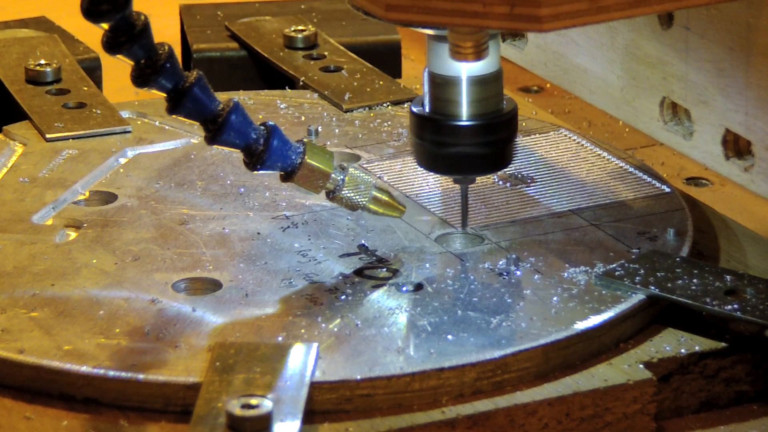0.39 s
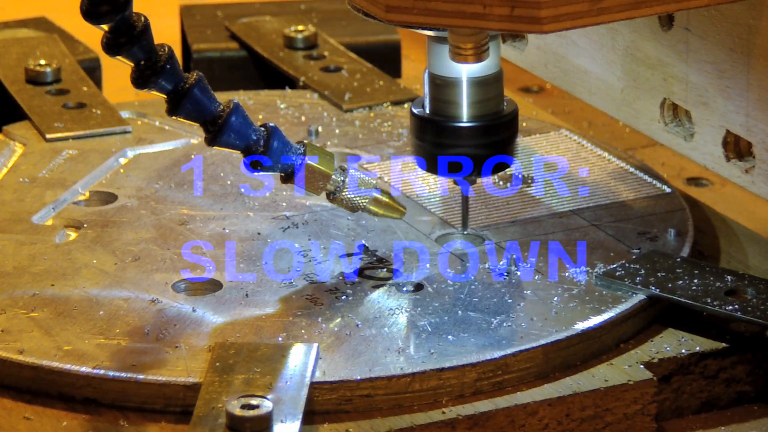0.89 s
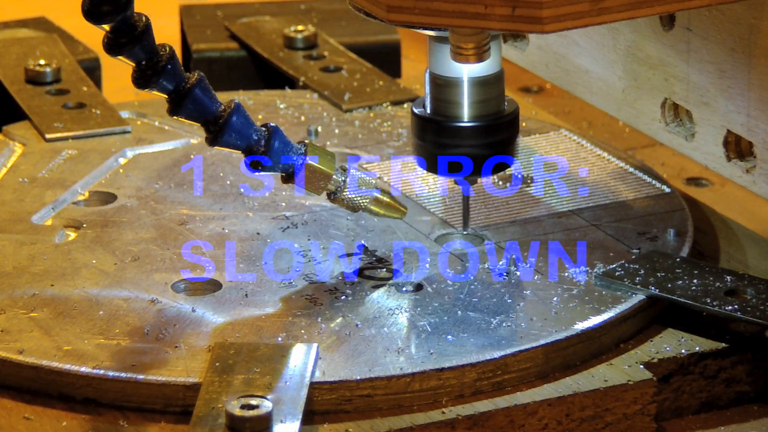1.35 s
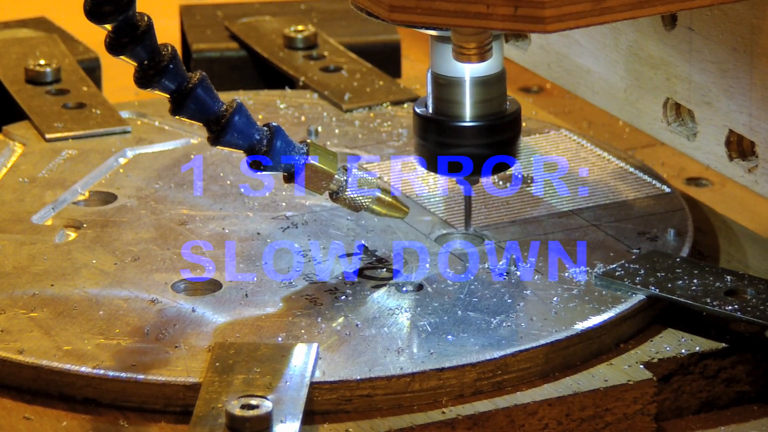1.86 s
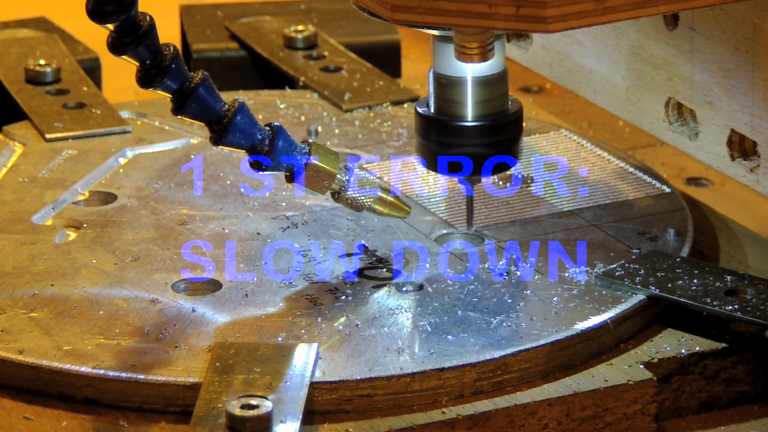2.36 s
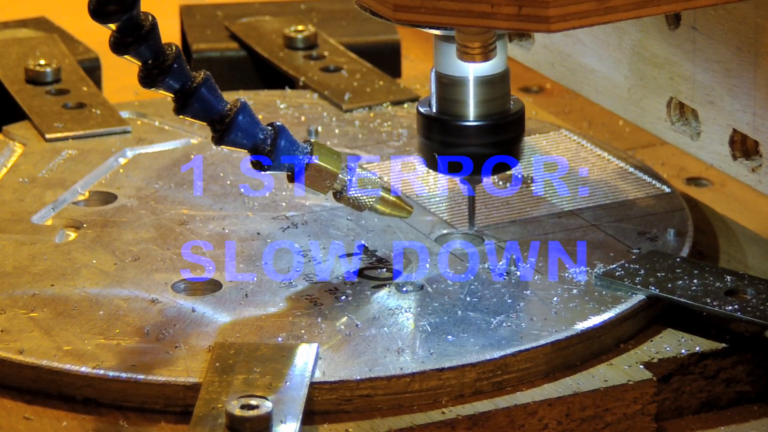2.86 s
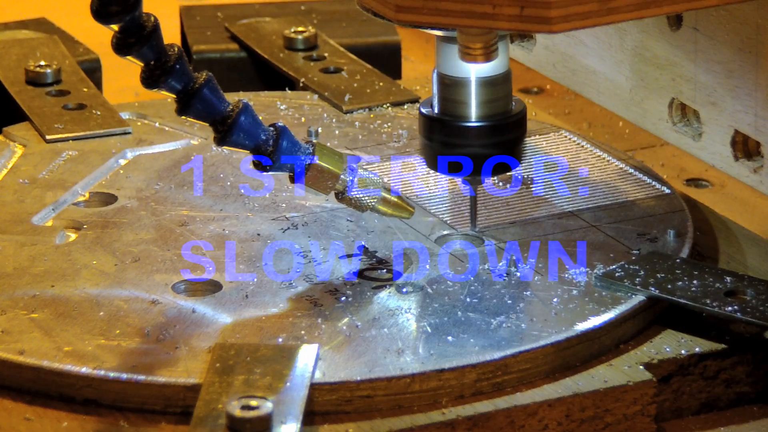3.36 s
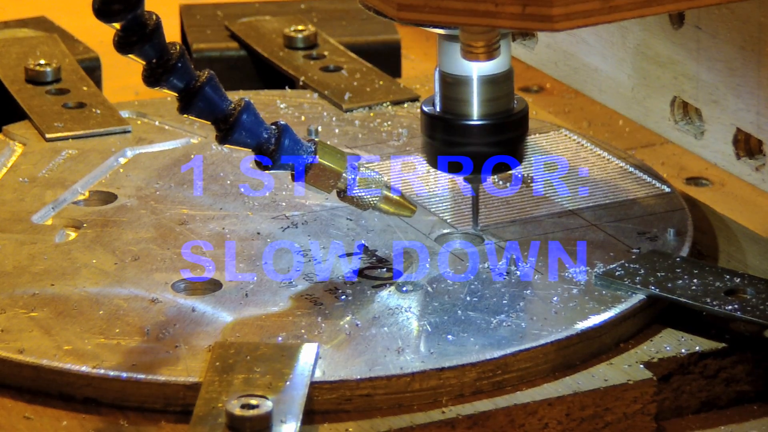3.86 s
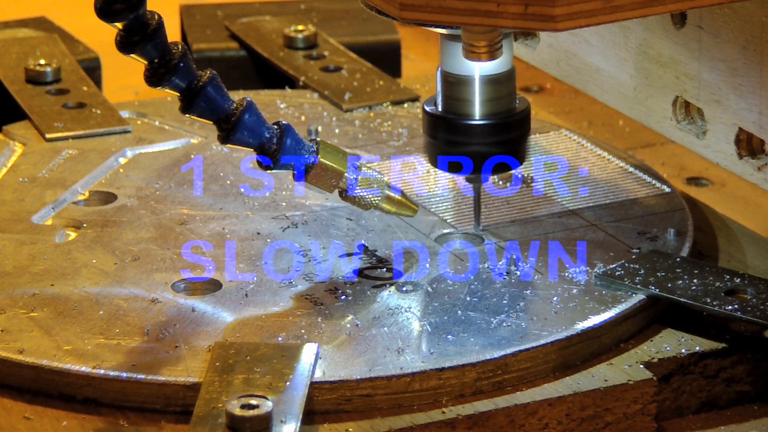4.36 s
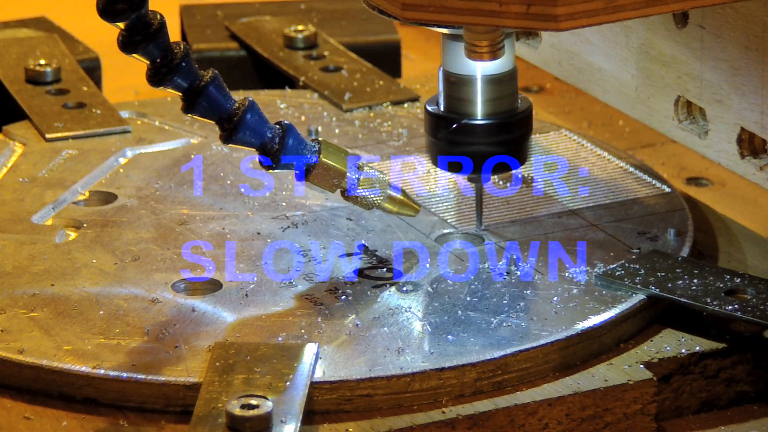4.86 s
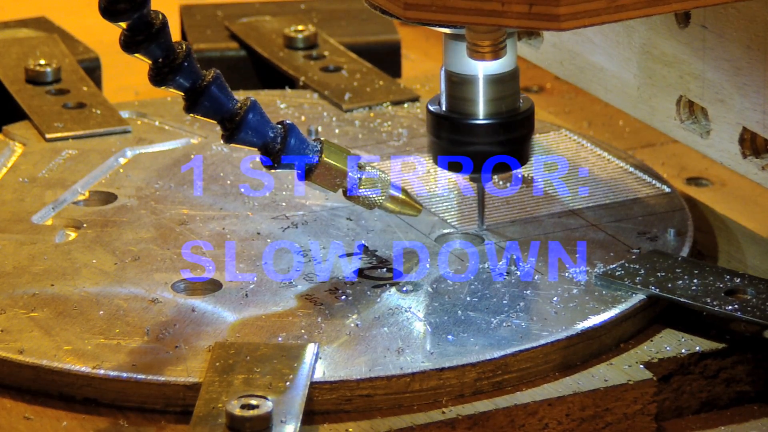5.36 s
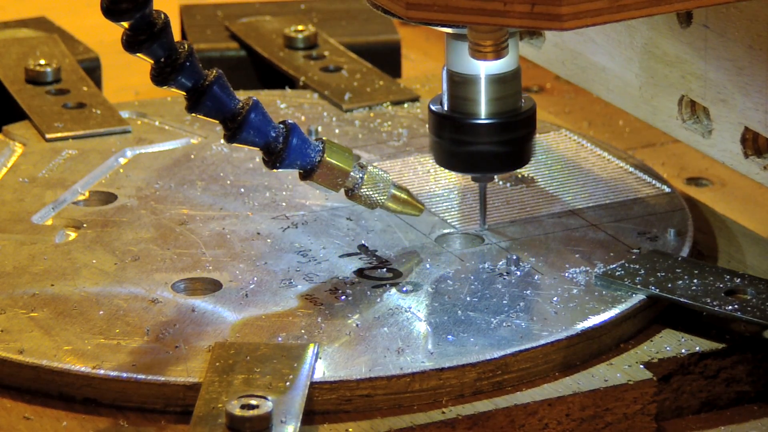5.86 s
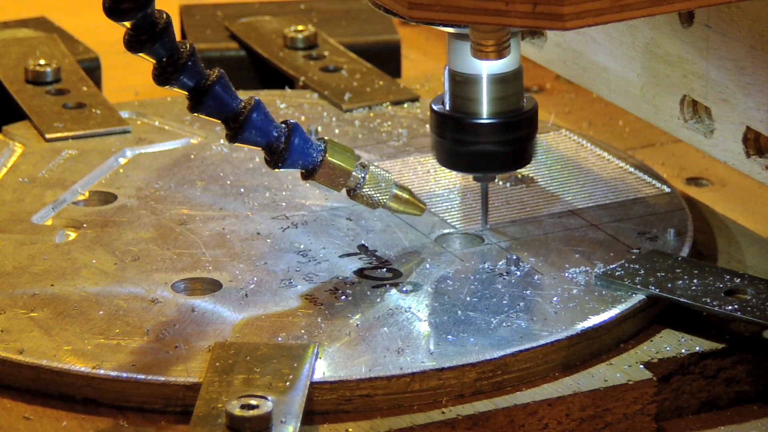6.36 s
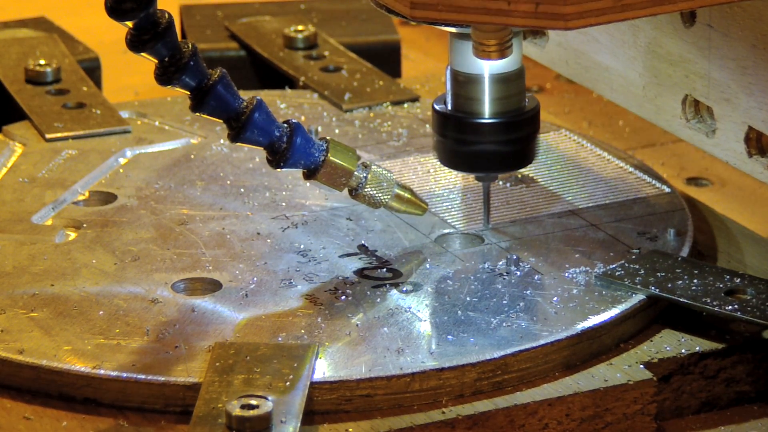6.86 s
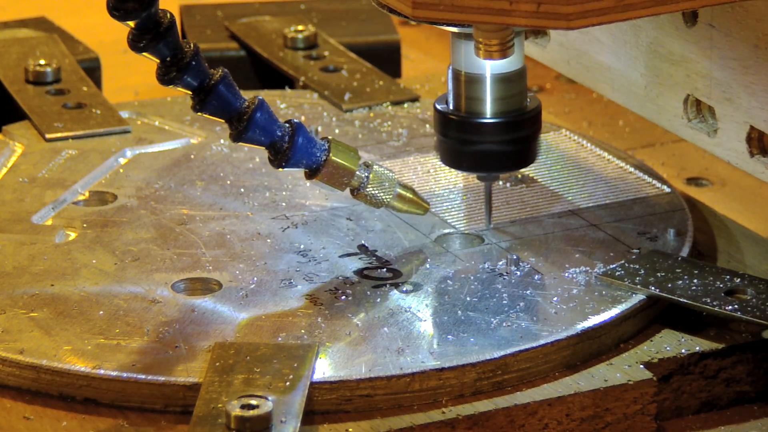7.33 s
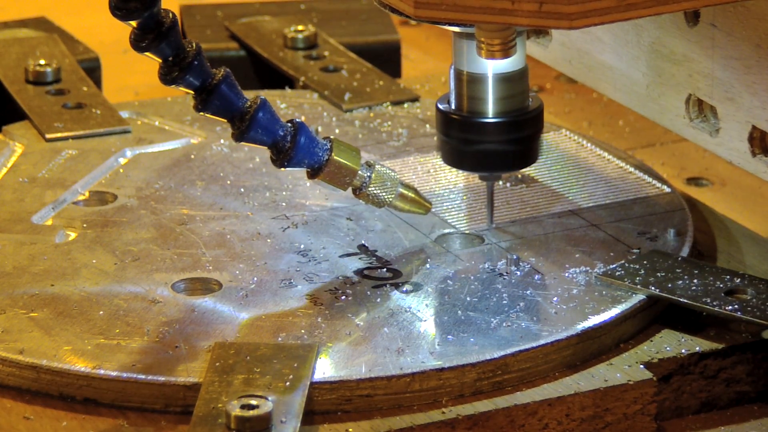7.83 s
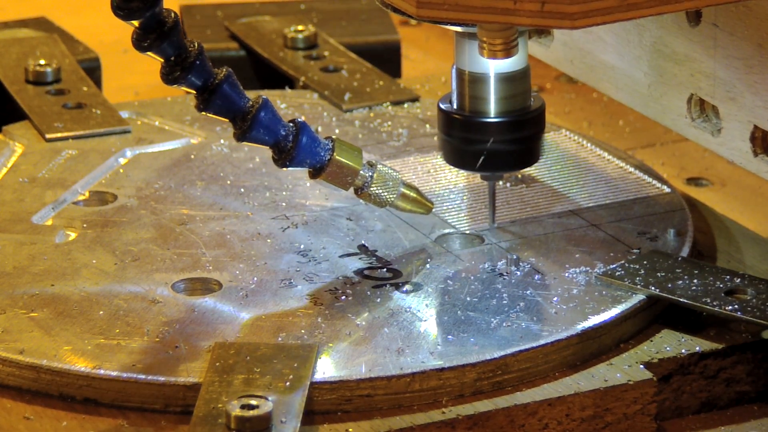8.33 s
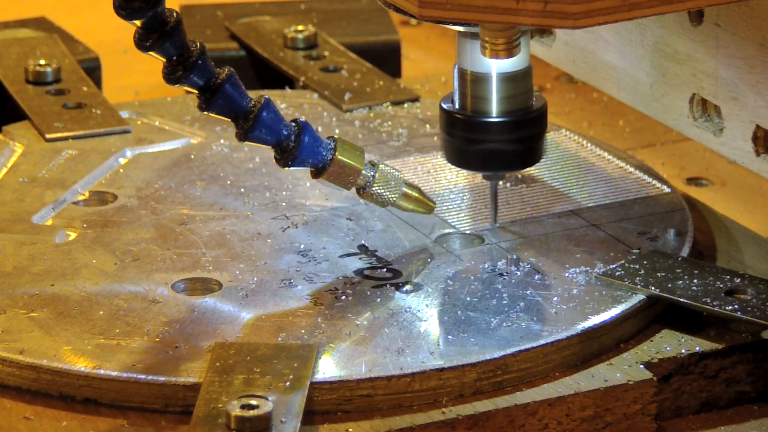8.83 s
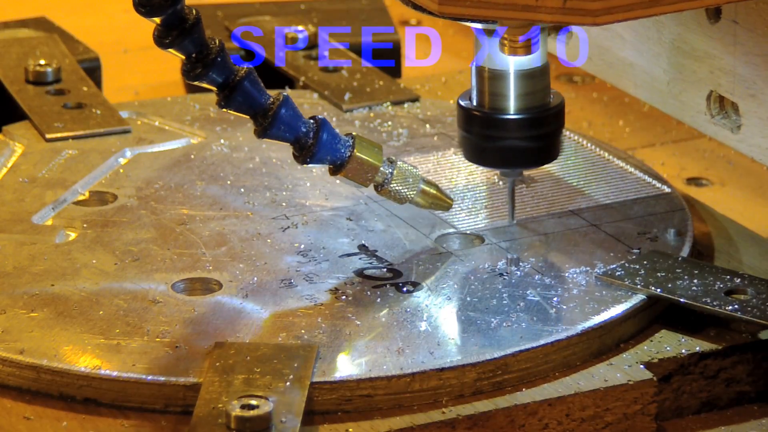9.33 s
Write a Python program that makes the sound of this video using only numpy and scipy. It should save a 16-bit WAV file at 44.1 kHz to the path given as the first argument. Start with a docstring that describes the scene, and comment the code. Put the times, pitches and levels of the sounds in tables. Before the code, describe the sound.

An air pump drones and knocks with fan hiss in a workshop; a small mill starts feeding, then bites into aluminium with a throbbing, chattering whine.

```python
"""An air pump drones and knocks over the hum of an axis drive; fans and the air jet fill the workshop.
The parked axis's holding tone dies away, positioning moves shake the frame and the feed tones rise.
After two seconds a small two-flute mill bites into an aluminium plate, with throbbing bites and chatter.
Motors are sums of orders of a turning angle; bites and noise ring resonances; air is shaped noise."""
import sys
import numpy as np
from scipy import signal
from scipy.fft import rfft, irfft, next_fast_len
from scipy.io import wavfile

SR = 44100
rng = np.random.default_rng(int(sys.argv[2]) if len(sys.argv) > 2 else 0)


def to_wav(s):
    """Save 16-bit WAV."""
    ch = np.atleast_2d(s).T  # columns
    pcm = np.round(np.clip(ch, -1, 1) * 32767)  # PCM
    wavfile.write(sys.argv[1], SR, pcm.astype(np.int16))


def how_loud(loudness_db):
    """Turn decibels into a plain amplitude multiplier (0 dB gives 1, 20 dB gives 10)."""
    steps = np.asarray(loudness_db, float) / 20
    return 10 ** steps


N = 417186
TIME, SIZE = np.arange(N) / SR, next_fast_len(N + SR // 2)
BINS = np.arange(SIZE // 2 + 1) * SR / SIZE + 1e-3   # Hz, kept off zero for divisions and logs
PUMP_HZ, DRIVE_HZ, SPINDLE_HZ = 45.62, 49.65, 133.8   # at pitch factor 1
TOUCH_S, PLUNGE_S = 2.15, 0.46   # first contact, time to full depth


def in_time(rows):
    """Join (time [s], value) rows by straight lines."""
    time_s, value = np.transpose(rows)
    return np.interp(TIME, time_s, value)


def at_hz(points, hz):
    """Read a spectrum on a log frequency axis."""
    point_hz, db = np.transpose(points)
    return np.interp(np.log(hz), np.log(point_hz), db)


def ramp(start_s, length_s):
    """Straight rise from 0 to 1."""
    return np.clip((TIME - start_s) / max(length_s, 1e-3), 0, 1)


def bump(centre_s, rise_s, fall_s, db):
    """Gaussian swell (or dip) in dB with separate rise and fall."""
    width_s = np.where(TIME < centre_s, rise_s, fall_s)
    return db * np.exp(-((TIME - centre_s) / width_s) ** 2)


def drift(rate_hz):
    """Slow random wander of spread 1: noise through a double pole, run at SR / 40."""
    pole = np.exp(-80 * np.pi * rate_hz / SR)
    noise = rng.standard_normal(N // 40 + 4002)
    slow = signal.lfilter([1], [1, -2 * pole, pole * pole], noise)[4000:]   # settled part
    return np.interp(np.arange(N) / 40, np.arange(len(slow)), slow / slow.std())


def resonances(modes, hz):
    """Complex response of parallel resonances with alternating signs."""
    total = 0
    for k, (mode_hz, width_hz, db) in enumerate(modes):
        total = total + (-1) ** k * how_loud(db) / (1 + 1j * (hz - mode_hz * mode_hz / hz) / width_hz)
    return total


def through(x, response):
    """Filter by a response given on BINS."""
    return irfft(rfft(x, SIZE) * response, SIZE)[..., :N]


def smear(decay_s):
    """Response of scattered decaying echoes: phase only, so timing blurs and colour stays."""
    echoes = rng.standard_normal(4000) * np.exp(-np.arange(4000) / (decay_s * SR))
    return np.exp(1j * np.angle(rfft(echoes, SIZE)))


# Pitch factor; every tone played by turns() rises 0.13 percent at 7.9 s: (time [s], factor [1])
PITCH_FACTOR = [(0, 1), (7.9, 1), (8.0, 1.0013), (9.5, 1.0013)]


def turns(hz):
    """Running count of cycles: the integral of rate times pitch factor."""
    return np.cumsum(hz * in_time(PITCH_FACTOR)) / SR


def cycle(lines, turn):
    """Play one revolution, given as complex rms lines per order, at the running angle."""
    table = irfft(lines, 8192) * 8192 / np.sqrt(2)
    return np.interp(turn % 1, np.arange(8193) / 8192, np.append(table, table[0]))


def orders(rows, turn, loose):
    """Steady orders plus two slowly wandering sets, so each order breathes by itself."""
    order, db = np.transpose(rows)
    out = 0
    for weight in (1, loose * drift(1.07), loose * drift(5.0)):
        lines = np.zeros(4097, complex)
        lines[order.astype(int)] = how_loud(db) * np.exp(2j * np.pi * rng.random(len(order)))
        out = out + weight * cycle(lines, turn)
    return out


# Brief swells of pump, hum and air together as the cut begins: (time [s], swell [dB])
ENTRY_SWELLS = [(2.19, 2), (2.5, 1), (2.68, 2.5)]


def entry_swell_db():
    """Brief swells as the cut begins, quick to rise and slower to fall."""
    rise_s, fall_s = 0.019, .12
    return sum(bump(s, rise_s, fall_s, db) for s, db in ENTRY_SWELLS)


# Common waxing and waning of pump, hum and air: (time [s], level [dB])
COMMON_LEVEL = [(0, .5), (.8, -1.5), (1.4, -0.04), (2, -1), (3.2, -0.4), (4.5, 0), (5.3, -0.2), (6, 1),
                (6.7, 0), (7.4, .5), (8.3, -0.8), (8.9, 0.5)]


def surge_db():
    """Slow wandering of the common level plus the entry swells."""
    return in_time(COMMON_LEVEL) + entry_swell_db()


# Pump tones before wander and surge: (order of the pump turn, level [dB rms])
PUMP_ORDERS = [(1, -29), (2, -33.5), (3, -52), (4, -43.5), (5, -35.5), (6, -49.5), (7, -41), (8, -44),
               (9, -33.5), (10, -27), (11, -31), (12, -29), (13, -26.5), (14, -45), (15, -33.5),
               (16, -34.5), (17, -30), (18, -35), (19, -36), (20, -33.5), (21, -46.5), (22, -38.5),
               (23, -44.5), (24, -35), (25, -33.5), (26, -36.5), (27, -52.5), (28, -44), (29, -51.5),
               (30, -40), (31, -49), (32, -34), (33, -39), (34, -49), (35, -39.5), (36, -47.5), (37, -45),
               (38, -47.5), (39, -44.5), (40, -39.5), (41, -41), (42, -47), (43, -41), (44, -49.5),
               (45, -42), (46, -44), (47, -55), (48, -48.5), (49, -58), (50, -52), (51, -64), (52, -63),
               (53, -56), (54, -51.5), (55, -52), (56, -65.5), (57, -51), (58, -48.5), (59, -55), (60, -44),
               (61, -49.5), (62, -65), (63, -64), (64, -49)]
# Valve and bearing knocks: (place in the turn [0-1], relative level [dB])
PUMP_KNOCKS = [(0, -4.5), (.37, -2), (0.618, -9)]
# Shell resonances rung by the knocks: (frequency [Hz], width [Hz], gain [dB])
SHELL_MODES = [(3680, 990, -56), (4450, 470, -56.5), (5800, 600, -70.5), (9500, 400, -50.5),
               (9850, 390, -51)]


def pump():
    """Drone of orders; a wobble of the turn flanks each order and knocks ring the shell up high."""
    wobble_hz, wobble_turns, wobble_depth = 8.7, .0015, 0.034
    wobble = 2 * np.pi * turns(wobble_hz)
    turn = turns(PUMP_HZ) + wobble_turns * np.sin(wobble) + .0001 * drift(3.0)
    order = np.arange(1, 4098)
    order_hz = order * PUMP_HZ
    knocks = sum(how_loud(db) * np.exp(-2j * np.pi * order * place) for place, db in PUMP_KNOCKS)
    # many small shell modes make the lines uneven
    uneven = how_loud(rng.uniform(-6, 4, len(order))) * np.exp(1j * rng.normal(0, 1, len(order)))
    audible = (order > len(PUMP_ORDERS)) * (order_hz < 16000)
    ring = knocks * uneven * resonances(SHELL_MODES, order_hz) * audible
    drone = orders(PUMP_ORDERS, turn, loose=0.14)
    knocking = cycle(np.append(0, ring[:-1]), turn)
    return (drone + knocking) * how_loud(surge_db()) * (1 + wobble_depth * np.cos(wobble))


def drive_hum(turn):
    """Drive orders 8 and 16 as sines that follow the surge; the octave fades once."""
    hum_db, octave_db = -18, -30   # rms, before surge and drift
    dip_centre_s, dip_half_width_s, dip_db = 8.15, 0.23, -16
    dip = bump(dip_centre_s, dip_half_width_s, dip_half_width_s, dip_db)
    hum = how_loud(hum_db + surge_db() + 0.66 * drift(1.5)) * np.sin(16 * np.pi * turn)
    octave = how_loud(octave_db + dip + surge_db() + 1.0 * drift(2.6)) * np.sin(32 * np.pi * turn)
    return np.sqrt(2) * (hum + octave)


def holding_tone():
    """Sine of the parked axis that dies away."""
    tone_hz, level_db_rms, end_s, fade_s = 216, -33, .5, .25
    fade = 1 - ramp(end_s, fade_s)
    return np.sqrt(2) * how_loud(level_db_rms) * fade * np.sin(2 * np.pi * tone_hz * TIME)


# Thin steady tones before level drift: (frequency at pitch factor 1 [Hz], level [dB rms])
WHINE_TONES = [(265, -45), (1044, -45), (2409, -44), (3864, -47), (4133, -52), (4669, -49), (5328, -50),
               (5738, -50), (6543, -50), (8265, -50)]


def whines():
    """Thin sines of electronics and bearings, wavering slightly in level and phase."""
    total = 0
    for hz, db in WHINE_TONES:
        phase = 2 * np.pi * turns(hz) + 0.66 * drift(0.92)
        total = total + np.sqrt(2) * how_loud(db + 1.5 * drift(1.8)) * np.sin(phase)
    return total


# Fans and air jet before bends, ripple and surge: (frequency [Hz], density [dB per Hz])
AIR_SPECTRUM = [(30, -80), (75, -58), (120, -71), (300, -59.5), (650, -62.5), (1100, -61.5), (1300, -67.5),
                (2050, -65.5), (2250, -70.5), (4000, -71.5), (6500, -67.5), (8500, -68.5), (9750, -72),
                (10600, -80.5), (12600, -99.5), (14300, -104)]
# Humps and one dip on that spectrum: (frequency [Hz], width [Hz], rise or fall [dB])
AIR_BENDS = [(457, 116, 9.5), (1442, 62, 8.5), (1790, 49, 2.5), (4140, 60, 5.5), (4750, 66, -3.5)]


def air():
    """Two independent broad noises with humps and a dip, pulsing gently three times a pump turn."""
    bends = sum(db / (1 + (2 * (BINS - hz) / width_hz) ** 2) for hz, width_hz, db in AIR_BENDS)
    # walls favour some pitches
    ripple = np.interp(BINS, np.arange(600) * 40, rng.normal(0, 2.5, 600))
    pulse = 1 + 0.055 * np.cos(6 * np.pi * turns(PUMP_HZ))
    level = pulse * how_loud(surge_db() + 0.58 * drift(3.4) + 0.24 * drift(17.0))
    white = rng.standard_normal((2, N)) * np.sqrt(SR / 2)   # unit density per Hz
    return through(level * white, how_loud(at_hz(AIR_SPECTRUM, BINS) + bends + ripple))


# Spindle tones at full running level, before wander: (order, level [dB rms])
SPINDLE_ORDERS = [(1, -40.5), (2, -38), (3, -39.5)]


def spindle():
    """Spindle orders, rising from a fifth to full amplitude."""
    running = np.clip((TIME - .5) / 0.49, .2, 1)
    return running * orders(SPINDLE_ORDERS, turns(SPINDLE_HZ), loose=0.23)


# Shaft resonances: (frequency [Hz], width [Hz], relative gain [dB])
SHAFT_MODES = [(1816, 50, -1.5), (1873, 33, 2.5), (2010, 28, -4.5)]
# Brief singing of the shaft: (time [s], swell [dB])
SHAFT_SINGS = [(7.27, 4.5), (7.68, 5), (8.01, 5)]


def shaft():
    """Flickering noise rings the shaft, louder under cutting load and in brief swells."""
    free_db, loaded_db, sing_s = -42, -39, 0.088
    level_db = free_db + (loaded_db - free_db) * ramp(TOUCH_S, PLUNGE_S)
    level_db = level_db + sum(bump(s, sing_s, sing_s, db) for s, db in SHAFT_SINGS)
    noise = how_loud(3.4 * drift(6.7)) * rng.standard_normal(N)
    band = 1 / (1 + ((BINS - 1900) / 250) ** 4)
    ring = through(noise, resonances(SHAFT_MODES, BINS) * band)
    return how_loud(level_db) * ring / ring.std()


# Frame resonances: (frequency [Hz], width [Hz], relative gain [dB])
FRAME_MODES = [(68, 17, -0.5), (133, 13, -8), (188, 20, 0.5), (236, 57, -0.5), (312, 78, -5)]
# Positioning moves, added to the resting rumble: (time [s], length [s], level [dB rms])
AXIS_MOVES = [(.51, .36, -25), (0.957, .18, -33.5), (1.24, .16, -34)]


def frame_shake():
    """Low noise rings the frame: a faint rest level plus a shudder at each move."""
    rest_db, edge_s = -49, 0.035
    level = how_loud(rest_db)
    for start_s, length_s, db in AXIS_MOVES:
        level = level + how_loud(db) * ramp(start_s, edge_s) * (1 - ramp(start_s + length_s, edge_s))
    low_pass = 1 / (1 + (BINS / 380) ** 8)
    shake = through(rng.standard_normal(N), resonances(FRAME_MODES, BINS) * low_pass)
    return level * shake / shake.std()


# Drive tones at full feed, before wander: (order, level [dB rms])
FEED_ORDERS = [(3, -45), (4, -32.5), (10, -37.5), (12, -40), (13, -50), (14, -48), (17, -47.5), (19, -46.5),
               (20, -52.5), (24, -43), (40, -48.5)]
# Tones that grow with table travel, at full feed: (order, level at time zero [dB rms])
GROWING_ORDERS = [(5, -40), (6, -46.5), (7, -43), (9.5, -47)]


def feed(turn):
    """Drive orders that come up as the axis starts; some grow as the table travels."""
    start_s, ramp_s, parked_db, growth_db_per_s = 0.56, 0.46, -22.5, 1.0
    feed_db = parked_db * (1 - ramp(start_s, ramp_s))
    travel = 0
    for order, db in GROWING_ORDERS:
        level = np.sqrt(2) * how_loud(db + growth_db_per_s * TIME)
        travel = travel + level * np.sin(2 * np.pi * order * turn)
    return how_loud(feed_db) * (orders(FEED_ORDERS, turn, loose=.15) + travel)


# Plate and cutter resonances: (frequency [Hz], width [Hz], relative gain [dB])
PLATE_MODES = [(2700, 200, -1), (2990, 200, -1), (3347, 160, 1), (4100, 170, -13.5), (6050, 550, -4.5),
               (11000, 500, -25), (12200, 700, -16.5)]


def plate_bites(turn, throb):
    """Runout makes one flute bite once a turn; click and tearing noise ring the plate."""
    bites = np.zeros(N)
    at = np.flatnonzero(np.diff(np.floor(turn)) > 0)
    bites[at] = 0.3 * how_loud(1.2 * rng.standard_normal(len(at)))
    engaged = np.exp(-5.0 * (turn % 1))
    tearing = 0.081 * engaged * rng.standard_normal(N)   # the chip shears after each bite
    low_pass = 1 / (1 + (BINS / 12700) ** 40)
    # the smear stands for waves running round the plate
    plate = through(throb * (bites + tearing), smear(0.0022) * resonances(PLATE_MODES, BINS) * low_pass)
    return plate / plate.std()


def chatter(turn, throb):
    """The tool vibrates at its own pitch, dying away after each bite, through two plate modes."""
    chatter_hz, decay_per_turn = 3186, 12   # pitch at factor 1
    level = throb * how_loud(1.5 * drift(3.0)) * np.exp(-decay_per_turn * (turn % 1))
    tone = level * np.sin(2 * np.pi * turns(chatter_hz) + 1.1 * drift(9.0))
    ring = through(tone, smear(.006) * resonances(PLATE_MODES[1:3], BINS))
    return ring / ring.std()


def cutter():
    """Bites and chatter plunge in and grow; the stepped feed makes them throb."""
    bite_db, bite_db_per_s, chatter_re_bites_db = -38.5, 0.41, -.5
    swell_factor = 1.4   # dB swing of the bite re the entry swells
    level_db = bite_db + bite_db_per_s * (TIME - TOUCH_S) + swell_factor * entry_swell_db()
    turn = turns(SPINDLE_HZ) + .007 * drift(12.0) + .05 * drift(1.0)
    step = 2 * np.pi * turns(DRIVE_HZ / 4) - .87 + .4 * drift(.8)
    throb = how_loud(3.0 * np.cos(step) + 0.7 * drift(10))
    cutting = plate_bites(turn, throb) + how_loud(chatter_re_bites_db) * chatter(turn, throb)
    return ramp(TOUCH_S, PLUNGE_S) * how_loud(level_db) * cutting


# Side spectrum before the trims in scene(): (frequency [Hz], side re mid [dB])
SIDE_SPECTRUM = [(60, -23), (110, -26), (200, -44), (370, -41), (670, -26), (1220, -23), (2230, -17),
                 (4070, -14.5), (7440, -10.5), (13600, -2)]
# Channel balance: (frequency [Hz], left re right [dB])
CHANNEL_BALANCE = [(60, 0.0), (110, 0.0), (200, 0.0), (370, 0.5), (670, 1.0), (1220, 0.5), (2230, 0.5),
                   (4070, -0.5), (7440, -1.5), (13600, -1.0)]


def scene():
    """Machines reach the two ports alike; short wall echoes and diffuse air make them differ."""
    drive_turn = turns(DRIVE_HZ) + .012 * drift(.4)
    near, diffuse = air()
    machines = pump() + drive_hum(drive_turn) + holding_tone() + whines() + spindle() + shaft()
    mid = machines + near + frame_shake() + feed(drive_turn) + cutter()
    side_db = at_hz(SIDE_SPECTRUM, BINS)
    echoes = through(mid, smear(.02) * how_loud(side_db - 2.0))
    side = echoes + through(diffuse, how_loud(side_db - 7))
    lean = how_loud(at_hz(CHANNEL_BALANCE, BINS) / 2)
    return np.array([through(mid + side, lean), through(mid - side, 1 / lean)])


def top_cut(x):
    """Nothing passes above the cut-off."""
    return signal.sosfilt(signal.butter(12, 14190, fs=SR, output="sos"), x)


def record(dry):
    """A reflection 64 microseconds late inside the housing notches 7.8 kHz; the end is cut to silence."""
    notch_hz, reflection, stop_s = 7800, .95, 8.909
    housing = (1 + reflection * np.exp(-1j * np.pi * BINS / notch_hz)) / (1 + reflection)
    mix = through(dry, housing) * (TIME < stop_s)
    return top_cut(mix)


dry = scene()
out = record(dry)
to_wav(out)
```